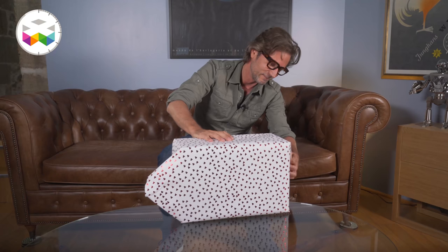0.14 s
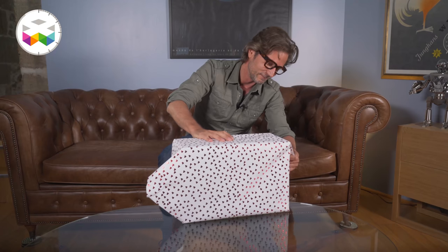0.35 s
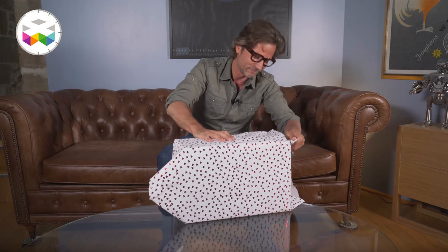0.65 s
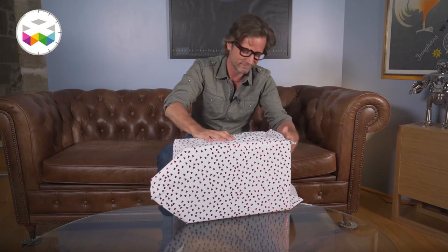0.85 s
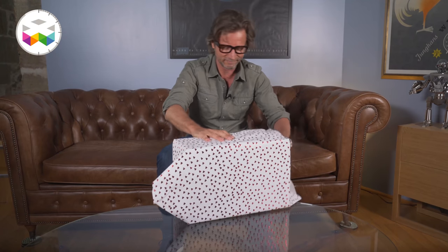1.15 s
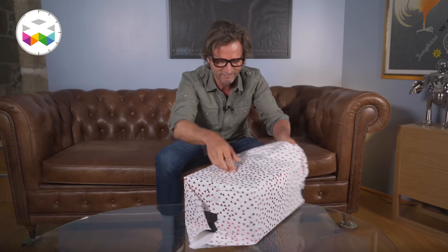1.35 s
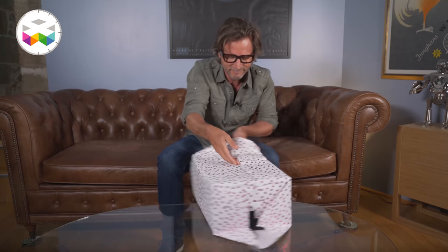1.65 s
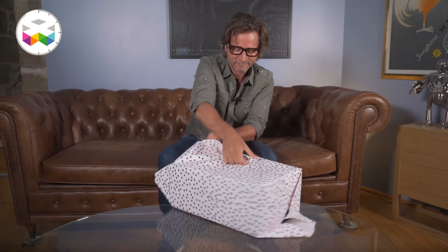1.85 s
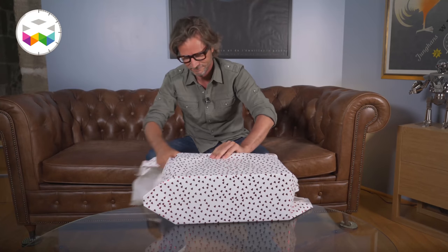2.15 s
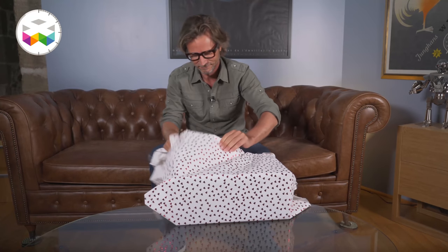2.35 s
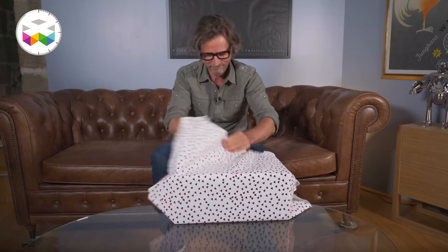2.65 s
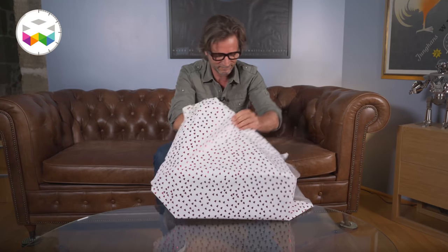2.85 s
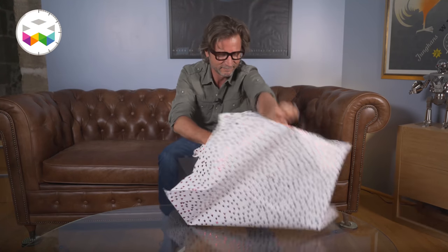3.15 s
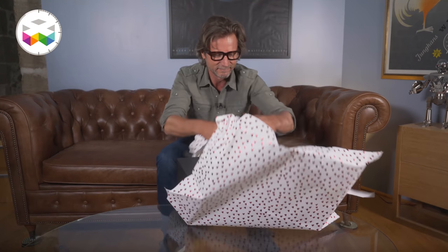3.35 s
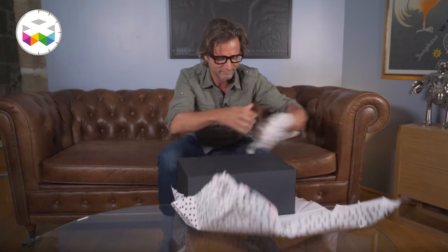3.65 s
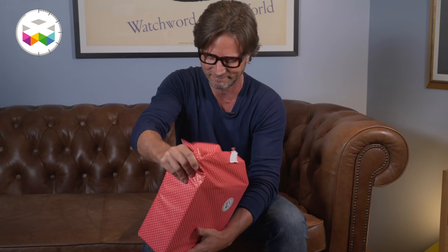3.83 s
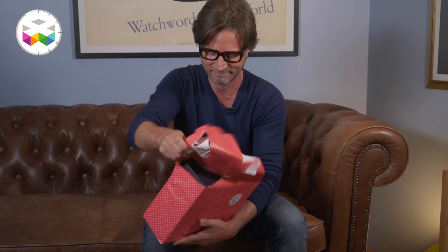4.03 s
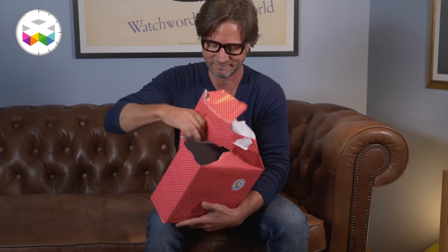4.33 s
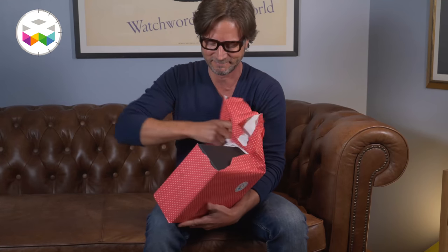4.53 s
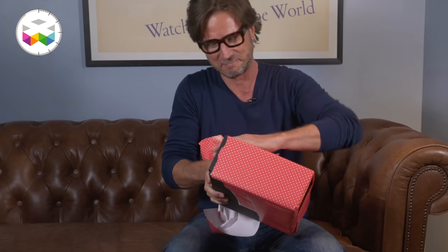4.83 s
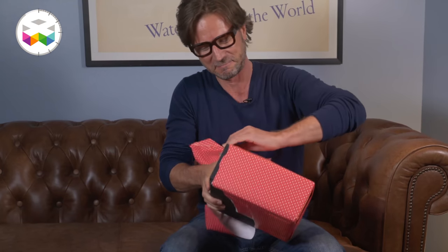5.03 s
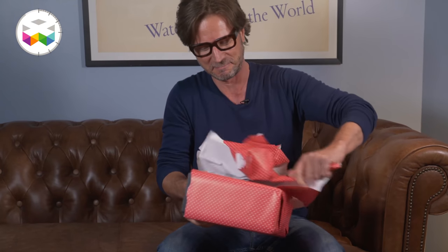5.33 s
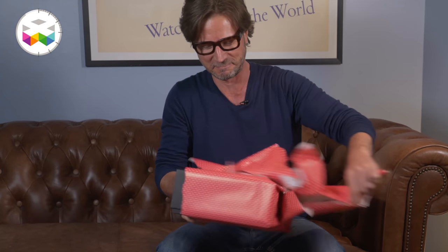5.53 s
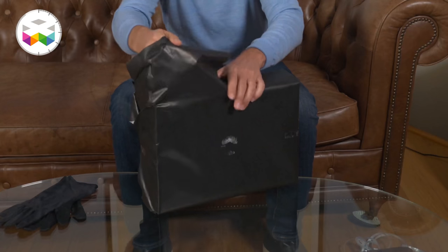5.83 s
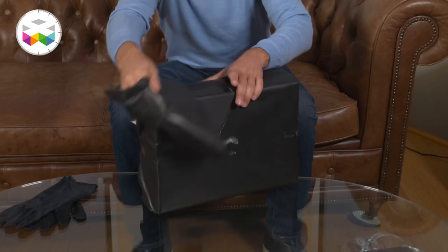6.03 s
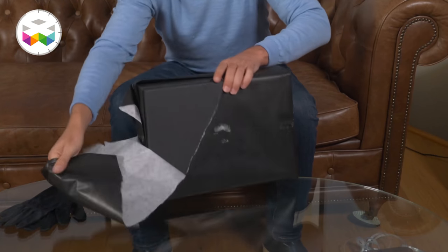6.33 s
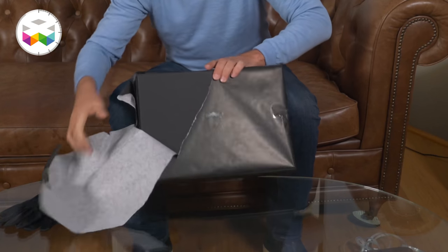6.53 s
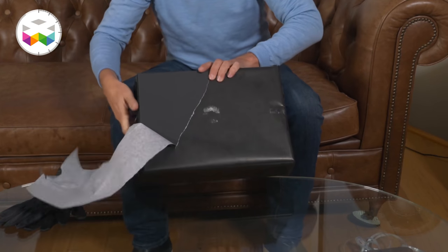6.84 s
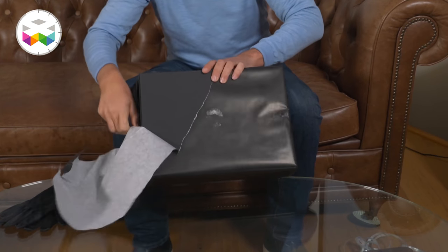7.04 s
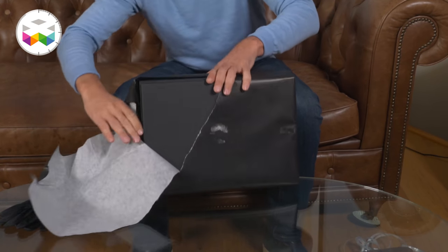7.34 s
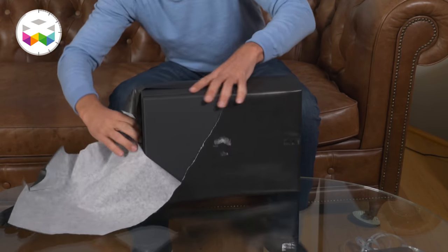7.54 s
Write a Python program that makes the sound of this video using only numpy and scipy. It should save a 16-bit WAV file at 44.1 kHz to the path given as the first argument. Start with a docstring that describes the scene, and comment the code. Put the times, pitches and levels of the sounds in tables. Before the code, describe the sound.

Hands rip and crumple wrapping paper off boxes indoors, in a rapid, irregular run of tearing, sharp crackles and a few hollow thuds.

```python
"""First comes a sharp rip and a thud: hands tear wrapping paper off cardboard boxes in a living room.
They rip and crumple thin, then glossy, then heavy paper. Creases buckle in swarms of tiny noise bursts,
big folds crack, fingers creak on the glossy side and the knocked boxes ring. Flapping sheets push air
at one nearby microphone, the loudest cracks clip, and a faint hiss lies under it all."""
import sys
import numpy as np
from scipy import signal
from scipy.fft import rfft, irfft, next_fast_len
from scipy.io import wavfile
from scipy.ndimage import uniform_filter1d

SR = 44100
rng = np.random.default_rng(int(sys.argv[2]) if len(sys.argv) > 2 else 0)


def unload_wav(signal):
    """Save mono or channel-first audio to the path in sys.argv[1] as 16-bit WAV at rate SR, clipped to [-1, 1]."""
    wavfile.write(
        sys.argv[1],
        SR,
        np.round(np.clip(np.atleast_2d(signal).T, -1, 1) * 32767).astype(np.int16),
    )


N = 338673

# Each pull of the hands: t/s at full strength, rise/s, hold/s, fall/s, level/dB, crumple (0 = tear, to 1),
# hollow f/Hz, large panels/dB and fibres/dB (both added to the level), pushed air/dB
HAND_PULLS = [(0.032, 0.12, 0.029, 0.16, -21, 0.065, 1840, -5.5, -9, -30.5),
              (0.344, 0.17, 0.0, 0.1, -24, 0.52, 1400.0, 2.5, -3, -32),
              (0.438, 0.34, 0.21, 0.26, -28, 0.83, 1200.0, -3, 0, -42),
              (0.602, 0.003, 0.046, 0.17, -17.5, 0.44, 5550, -1.5, -1.5, -33),
              (0.94, 0.29, 0, 0.24, -26.5, 0.66, 4230, -4.5, -5.5, -40.0),
              (1.148, 0.1, 0.0001, 0.061, -17, 0.84, 5500.0, -1, -1.5, -35.0),
              (1.28, 0.17, 0, 0.18, -19.5, 0.4, 3320, -2, -2.5, -32),
              (1.614, 0.34, 0, 0.023, -36.5, 0.95, 4200.0, 0.5, -12, -48),
              (1.81, 0.19, 0.0045, 0.072, -17, 0.94, 1410, -8, 1, -42),
              (1.939, 0.22, 0.061, 0.14, -24.5, 0.56, 5500.0, -1, -1.5, -41),
              (2.156, 0.028, 0.0082, 0.033, -18.5, 0.54, 1210, -2.5, -1.5, -38.0),
              (2.214, 0.13, 0.16, 0.037, -25.5, 0.63, 5000, -4, -3, -40),
              (2.445, 0.089, 0.073, 0.16, -26.5, 0.7, 690, -3, -2.5, -51),
              (2.724, 0.075, 0.02, 0.15, -17, 0.44, 5600, -2, -2, -26.5),
              (2.967, 0.32, 0.01, 0.31, -26, 0.6, 597, 0, -8, -39),
              (3.12, 0.021, 0.024, 0.15, -17, 0.5, 1530, -3, -9, -48),
              (3.304, 0.065, 0.013, 0.51, -32, 0.64, 700.0, -2, -4.5, -41),
              (3.555, 0.047, 0.058, 0.09, -16.5, 0.26, 2500, -2, -7, -25),
              (3.734, 0.03, 0.00021, 0.16, -23, 0.26, 600.0, -5.5, -9.5, -39),
              (3.931, 0.0048, 0.05, 0.05, -17.5, 0.1, 903, -4, 1, -32),
              (4.182, 0.3, 0.073, 0.12, -26, 0.51, 710, -9, -5.5, -43),
              (4.356, 0.058, 0.029, 0.021, -26.5, 0.3, 1040.0, 4.5, -1, -40),
              (4.417, 0.03, 0.092, 0.35, -18.5, 0.15, 3160, -4.5, -2.5, -35),
              (4.676, 0.22, 0.02, 0.18, -20.5, 0.37, 3880, -1.5, -6, -31),
              (4.848, 0.027, 0, 0.19, -29, 1, 596, -3, -16, -38),
              (5.047, 0.043, 0.012, 0.037, -20, 0.3, 3600.0, 0, -13, -47),
              (5.103, 0.018, 0.09, 0.21, -24.5, 0.69, 1570, -17, -5.5, -41),
              (5.262, 0.5, 0.15, 0.11, -25.5, 0.13, 4100, -3.5, -0.5, -46),
              (5.59, 0.16, 0.0054, 0.23, -21.5, 0.13, 910.0, -6.5, -3.5, -43),
              (5.834, 0.003, 0.011, 0.27, -18.5, 0.47, 810, -5.5, -4, -31),
              (5.998, 0.003, 0.021, 0.023, -21.5, 0.2, 810, 8.5, 2, -37),
              (6.039, 0.015, 0.018, 0.033, -18.5, 0.22, 810, 2, 2, -27.5),
              (6.09, 0.13, 0.046, 0.39, -22.5, 0.15, 3100, -2.5, -0.5, -43),
              (6.25, 0.14, 0.17, 0.35, -23.0, 0.21, 1100.0, -6.0, -6.5, -43),
              (6.81, 0.0052, 0.025, 0.12, -26, 0.42, 800.0, -3.5, -6.5, -37),
              (6.913, 0.026, 0.18, 0.083, -28.5, 0.41, 4170, -3.5, -3, -44),
              (7.111, 0.025, 0.13, 0.12, -25.5, 0.52, 1290, -3.5, -7, -45),
              (7.258, 0.028, 0.14, 0.037, -30.5, 0.44, 1600.0, -8, -3.5, -43),
              (7.619, 0.19, 0.088, 0.274, -23, 0.51, 4830, -0.5, -1.0, -33.5)]
CUT_S = 4.8  # earlier pulls and their echo stop short here
def paper():
    """Tearing is a dense fine rasp, crumpling a sparse swarm; both, and the cracks, shake the sheet."""
    db, crumpling, hollow_hz, panel_db, fibre_db = np.transpose(HAND_PULLS)[4:9]
    t = np.arange(N) / SR
    grid, creases = pull_power(db, rest_db=-60)
    _, panels = pull_power(db + panel_db, rest_db=-58.5)
    _, fibres = pull_power(db + fibre_db, rest_db=-51.5, fall_share=0.81)
    smooth = lambda values: np.interp(t, grid, values)
    strength = np.repeat([smooth(part.sum(axis=0)) for part in (panels, creases, fibres)], 4, axis=0)
    lead = creases ** 2 / np.sum(creases ** 2, axis=0)  # the strongest pull shapes the sheet
    bend = 0.19 * np.interp(grid, t, wander(1900))  # the hollow changes as the sheet bends
    bent_hz = np.exp(np.log(hollow_hz) @ lead + bend)
    hollow = np.array([smooth(band) for band in band_shares(bent_hz, octaves=0.18, base=0.37)])
    waver = undb(1.97 * np.array([wander(1180) for _ in range(12)])) ** 2  # each band on its own
    crumple = smooth(np.clip(crumpling @ lead, 0, 1))
    snaps = swarm(per_s=400, spread_db=3.9, cap_db=13.5, rise_ms=0.08, ms=0.74, octaves=0.45, base=0.015)
    rips = swarm(per_s=1600, spread_db=1.2, cap_db=4.4, rise_ms=0.6, ms=1.6, octaves=0.37, base=0.017)
    buckles = swarm(per_s=240, spread_db=5.1, cap_db=10.6, rise_ms=0.073, ms=3.9, octaves=0.76, base=0.011)
    rasp = 0.21 + 0.37 * rips + 0.052 * snaps  # snaps are single fibres parting
    grain = (1 - crumple) * rasp + crumple * buckles
    grain[:4] = 0.7 * grain[:4] + 0.31  # large panels move more evenly
    shaken = paper_noise() * np.sqrt(strength * hollow * waver * grain + cracks())
    return shaken.sum(axis=0)


def pull_power(db, rest_db, fall_share=1):
    """Each pull swells, holds and dies away to a settling sheet. Gives times and power per pull."""
    t = np.arange(N // 44 + 2) * 44 / SR  # about 1 ms apart
    start, rise, hold, fall = np.abs(np.transpose(HAND_PULLS)[:4, :, None])
    rising = (start - t) / rise
    falling = (t - start - hold) / (fall * fall_share)
    drop_db = 20 * np.maximum(np.maximum(rising, falling), 0)
    sounding = (start > CUT_S) | (t < CUT_S)
    power = undb(db[:, None] - drop_db) ** 2 * sounding
    return t, power + undb(rest_db) ** 2 / len(HAND_PULLS)


def swarm(per_s, spread_db, cap_db, rise_ms, ms, octaves, base):
    """Tiny ticks of paper at random times and pitches, few large and many small; average power 1."""
    when, rank, pitch = rng.random((int(per_s * N / SR), 3)).T
    size = undb(np.minimum(-spread_db * np.log(1 - rank), cap_db))
    shares = band_shares(250 * 60 ** pitch, octaves, base)
    power = bursts((when * N).astype(int), size ** 2 * shares, ms, rise_ms)
    return power / power.mean(axis=1, keepdims=True)


# Borders of twelve pitch bands, low to high: f/Hz
BAND_EDGES = (110, 220, 360, 560, 900, 1400, 2200, 3500, 5500, 7500, 10000, 13000, 17000)
# The tone of each kind of paper: f/Hz, relative level/dB
THIN_PAPER = [(59, -20), (100, 0), (135, -2.5), (435, -2.5), (898, -7), (1560, -3.5), (3360, -6),
              (5730, -7.5), (14900, -16.5), (16300, -12)]
GLOSSY_PAPER = [(59, -30), (100, -2.5), (303, -2), (408, -4.5), (710, -2), (1600, -5.5), (3440, -6.5),
                (6650, -12.5), (12300, -4), (15300, -2.5), (16300, -23)]
HEAVY_PAPER = [(59, -39), (100, -20), (156, -5), (230, -8.5), (278, -6), (599, -4), (824, -1), (2500, -2.5),
               (9970, -5.5), (14900, -10.5), (16300, -22)]
NEXT_PAPER_S = (3.92, 5.82)
def paper_noise():
    """Each paper's rustle in twelve bands: four each for panels (low), creases and fibres (high)."""
    out, edges = np.zeros((12, N)), np.array(BAND_EDGES)
    starts = [0] + [int(s * SR) for s in NEXT_PAPER_S] + [N]
    for tone, start, end in zip((THIN_PAPER, GLOSSY_PAPER, HEAVY_PAPER), starts, starts[1:]):
        spectrum, hz = noise_spectrum(tone)
        above = 1 / (1 + (edges[:, None] / hz) ** 8)
        bands = irfft(spectrum * np.sqrt(above[:-1] - above[1:]), next_fast_len(N))[:, start:end]
        group_power = np.mean(bands ** 2, axis=1).reshape(3, 4).sum(axis=1)
        out[:, start:end] = bands / np.repeat(np.sqrt(group_power), 4)[:, None]
    return out


# Big folds giving way: t/s, relative level/dB, f/Hz, extra level for the fibres/dB
FOLD_CRACKS = [(0.05, 2, 5300, -17), (0.1752, -8, 4100, -6), (0.228, -10, 5040, 6.5),
               (0.2579, 4.5, 6100, -4), (0.3087, 1, 4120, -11), (0.332, 1.5, 1490, 0), (0.345, 1, 1400, -2),
               (0.362, 1, 5660, -5), (0.407, -4, 6000, -11), (0.435, -9, 1550, 5.5), (0.4444, 1, 5900, -7),
               (0.477, -10, 2080, -13), (0.4995, 0.5, 2190, -14), (0.504, -1, 484, -10),
               (0.544, -3.5, 504, 3), (0.6037, 7, 900, -3), (0.643, 2, 2850, -2), (0.679, -4, 5700, -6),
               (0.7348, -1.5, 2330, -8), (0.9625, -1, 2130, -9), (1.083, -5.5, 1530, -2),
               (1.102, 0, 5960, -4), (1.109, -1.5, 1220, 4), (1.1477, -3, 7140, 3), (1.1544, 0.5, 3400, -6),
               (1.1928, -0.5, 710, -8), (1.227, -1.5, 1520, -21), (1.2762, 0, 2520, -13),
               (1.286, 1, 4400, 1), (1.3419, 0.5, 5140, -5), (1.3542, 3, 3350, -0.5),
               (1.4534, -5.5, 3380, -0.5), (1.6093, -8.5, 2300, -3), (1.767, 3, 8300, 2),
               (1.8004, -1, 1500, -6), (1.842, 2, 5740, 1), (2.032, -12, 1740, 7), (2.153, -6, 3120, -5),
               (2.227, -4, 3660, 3), (2.236, -1, 6500, 1), (2.3083, -7, 2170, -6),
               (2.4253, 2.5, 7400, -3.5), (2.4444, -5, 2210, 1), (2.4572, -4, 2130, 5),
               (2.5122, -1, 490, -1), (2.5334, 0.5, 900, 1), (2.627, -4.5, 2040, -9), (2.635, 1, 5500, 0.5),
               (2.644, -11, 7000, 1), (2.674, -1, 4800, 0), (2.698, -7, 2800, -4), (2.735, 2, 5500, -6),
               (2.755, -2, 4900, 1), (2.687, 3, 3120, 2), (2.721, -7, 660, 5), (2.889, -6, 2410, 1.5),
               (2.9763, 1, 5200, 1), (3.097, -0.5, 2570, -25), (3.131, 2, 1200, 2),
               (3.304, -5.5, 2270, 1.5), (3.322, -6, 2000, -2), (3.469, -9.5, 900, 3),
               (3.5102, -4, 2580, 1), (3.5585, 2, 2520, -1), (3.573, 3.5, 2520, -3), (3.585, 5.5, 4600, -7),
               (3.592, 4, 7040, -4), (3.61, 8.5, 2650, 0), (3.6509, 3.5, 5530, -5.5),
               (3.733, -8.5, 2200, -1), (3.741, -4, 1820, -6), (3.8945, -11, 9000, -3),
                (4.128, -12, 880, 11), (4.145, -7.5, 2180, -4), (4.1717, -9, 7940, -2),
               (4.2435, -12, 3000, 3), (4.3486, -5, 700, -1), (4.377, -8.5, 3520, 2), (4.395, -18, 3000, 8),
               (4.503, -6, 2480, 6), (4.705, -3, 2500, -11), (4.749, -12, 2530, -2),
               (4.8312, -15, 2540, -10), (4.8564, -4.5, 2400, -7), (4.8985, -9.5, 3500, -10),
               (5.0759, 0.5, 3600, -14), (5.1177, 1, 1700, -5), (5.6, -1, 870, 1), (5.772, -9, 3300, -14),
               (5.8336, -12.5, 814, 10), (5.87, -0.5, 684, 2), (5.8914, -3, 920, 2), (5.915, -3, 710, -6),
               (5.9488, -13, 900, 2), (5.966, -3.5, 800, 0), (5.9985, 1, 930, -8),
               (6.1536, -1.5, 1230, -17), (6.2566, -1, 1410, 4), (6.265, -7, 7250, 5),
               (6.29, 0.5, 1170, -1), (6.336, 2, 1290, -4), (6.364, -5, 1370, 3), (6.373, -4, 8000, 2),
               (6.4263, -9, 1520, 8), (6.4394, -5.5, 1250, 1), (6.512, -10, 1200, -6),
               (6.782, -13.5, 2040, -11), (6.813, -8.5, 886, -4), (6.872, -4.5, 5040, 1),
               (6.9045, -9, 4100, -11), (6.925, -6, 3500, 0), (6.94, -10, 4200, -3),
               (6.945, -1.5, 4100, -2), (6.998, -10, 1500, 2), (7.047, -3, 4130, -7),
               (7.135, -0.5, 746, -6), (7.15, -4, 1460, -5), (7.1823, -0.5, 1660, 2),
               (7.203, -3, 2180, -11), (7.106, -6, 1090, -9), (7.3008, -8, 1290, 1), (7.462, -10, 595, -1),
               (7.495, -3, 3570, -3.5), (7.3717, -0.5, 7550, 1), (7.608, -3.5, 4950, 5),
               (7.6434, -5, 1660, 3), (7.6588, -7, 2220, 7)]
def cracks():
    """A fold cracks in one short burst of power; fibres set the top four bands."""
    s, db, hz, fibre_db = np.transpose(FOLD_CRACKS)
    power = undb(db - 8.5) ** 2 * band_shares(hz, octaves=0.23, base=0.052)
    power[8:] = undb(db + fibre_db - 16) ** 2
    return bursts((s * SR).astype(int), power, ms=2.34, rise_ms=0.16)


def pings(cycles=30, relative_db=-14.5):
    """The flat patch beside each fold rings briefly at the fold's pitch."""
    out, t = np.zeros(N + 1000), np.arange(1000) / SR
    for s, db, hz, _ in FOLD_CRACKS:
        i = int(s * SR)
        decay = np.exp(-t * (hz / cycles + 150))
        out[i:i + len(t)] += undb(db + relative_db) * np.sin(2 * np.pi * hz * t) * decay
    return out[:N]


# Knocks on a box: t/s, level/dB, f/Hz
BOX_KNOCKS = [(0.04, -15, 162), (0.605, -11.5, 347), (2.418, -20, 62), (2.699, -25, 360), (3.609, -12, 87),
              (4.677, -13.5, 122)]
def thuds(ring_s=0.13):
    """A knocked hollow box rings low, fading by 60 dB in ring_s."""
    out, t = np.zeros(N), np.arange(8000) / SR
    for s, db, hz in BOX_KNOCKS:
        i = int(s * SR)
        out[i:i + len(t)] += undb(db) * np.sin(2 * np.pi * hz * t) * 1000 ** (-t / ring_s)
    return out


# One list of points per finger slide: t/s, slip rate/Hz, relative level/dB, brightness (0 = dull)
FINGER_SLIDES = [
    [(4.92, 400, -45, 0.2), (4.945, 450, -21, 0.1), (4.958, 450, -30, 0.1), (4.968, 520, -28, 0)],
    [(4.9735, 80, -32, 0.7), (4.99, 83, -29, 0), (5.01, 116, -18.5, 0.28), (5.026, 140, -19.5, 0.3),
     (5.04, 245, -21, 1), (5.05, 300, -25, 1.2), (5.062, 320, -38, 2.1)],
]
# Notes at which the tight sheet rings: f/Hz, width/Hz, relative level/dB
SHEET_NOTES = [(453, 580, -1.5), (736, 124, 6.5), (1540, 190, 5.5), (3500, 1100, -2), (10000, 6000, -9)]
def creaks():
    """Skin sticks and slips on the tight sheet, and every slip makes it ring."""
    dull, bright, t = np.zeros(N), np.zeros(N), np.arange(N) / SR
    for slide in FINGER_SLIDES:
        s, hz, db, brightness = np.transpose(slide)
        rate = np.interp(t, s, hz, left=0, right=0)
        slips = np.diff(np.ceil(np.cumsum(rate) / SR), prepend=0)  # one click per cycle
        slips *= np.sqrt(SR / np.maximum(rate, 1)) * undb(np.interp(t, s, db))
        dull += slips
        bright += slips * np.interp(t, s, brightness)
    ringing = np.zeros(N)
    for k, (hz, width, db) in enumerate(SHEET_NOTES):
        resonance = signal.iirpeak(hz, hz / width, fs=SR)
        ringing += (-1) ** k * undb(db) * signal.lfilter(*resonance, dull if hz < 1000 else bright)
    return 1.9 * fade(ringing, ms=0.05)  # soft skin spreads each slip over a moment


# The tone of a puff of air and of its deepest part: f/Hz, relative level/dB
PUFF_TONE, DEEP_TONE = [(40, -10), (60, -1), (100, -1.5), (160, -6.5)], [(16, -13), (32, 10), (55, -12)]
# Deep part against the puff for thin, glossy and heavy paper (which wafts most): level/dB
WAFT_DB = (-6.5, -17, 4.5)
def air():
    """Each pull pushes a low, wavering puff of air at the microphone."""
    s, db = np.transpose(HAND_PULLS)[[0, 9]]
    deep_db = db + np.take(WAFT_DB, np.searchsorted(NEXT_PAPER_S, s))
    out = np.zeros(N)
    for tone, level_db in ((PUFF_TONE, db), (DEEP_TONE, deep_db)):
        grid, power = pull_power(level_db, rest_db=-54.5, fall_share=1.12)
        swell = np.interp(np.arange(N) / SR, grid, np.sqrt(power.sum(axis=0)))
        out += steady_noise(tone) * swell * undb(1.3 * wander(1700))
    return out


def room(x, ring_s=0.97, echo_db=-14):
    """A softly furnished room adds a blurred echo that loses its high notes first."""
    t = np.arange(int(.5 * SR)) / SR
    bright = rng.standard_normal(len(t)) * 1000 ** (-t / (.5 * ring_s))
    dull = fade(rng.standard_normal(len(t)), ms=0.078) * 1000 ** (-t / ring_s)
    tail = (bright + 0.24 * dull) * np.clip(t / 0.0015 - .5, 0, 1)
    return undb(echo_db) * signal.fftconvolve(x, tail / np.sqrt(np.sum(tail ** 2)))[:N]


# The tone of the hiss: f/Hz, relative level/dB; then its overall level
HISS_TONE, HISS_DB = [(150, 1), (1000, -19), (5000, -12), (16000, -14)], -52
def hiss():
    """The room and the microphone hiss faintly all the time."""
    return undb(HISS_DB) * steady_noise(HISS_TONE)


def band_shares(hz, octaves, base):
    """Power in each band: a hump around hz on top of an even base."""
    centres = np.sqrt(np.multiply(BAND_EDGES[1:], BAND_EDGES[:-1]))[:, None]
    return base + np.exp(-.5 * (np.log2(centres / hz) / octaves) ** 2)


def bursts(starts, power, ms, rise_ms):
    """Power over time in each band: a quick rise, then a fade that is shorter for higher bands."""
    out = np.zeros((12, N))
    for k in range(12):
        np.add.at(out[k], starts, power[k])
        out[k] = fade(out[k], ms * (1500 / BAND_EDGES[k]) ** 0.085 / 2)
    soft = np.exp(-1000 / (rise_ms * SR))
    return signal.lfilter([1 - soft], [1, -soft], out)


def noise_spectrum(tone):
    """The spectrum of a noise with the given tone, and its frequencies."""
    size = next_fast_len(N)
    hz = np.maximum(np.fft.rfftfreq(size, 1 / SR), 1)
    tone_hz, tone_db = np.transpose(tone)
    db = np.interp(np.log(hz), np.log(tone_hz), tone_db, left=-90, right=-90)
    return rfft(rng.standard_normal(size)) * undb(db), hz


def steady_noise(tone):
    """Noise with the given tone and average power 1."""
    spectrum, _ = noise_spectrum(tone)
    return unit(irfft(spectrum, next_fast_len(N))[:N])


def wander(span):
    """A slow random drift that changes over span samples."""
    return unit(uniform_filter1d(uniform_filter1d(rng.standard_normal(N), span), span))


def fade(x, ms):
    """Give every click a tail that dies away."""
    return signal.lfilter([1], [1, -np.exp(-1000 / (ms * SR))], x)


def unit(x):
    """Scale to average power 1."""
    return x / np.sqrt(np.mean(x ** 2))


def undb(db):
    """Turn decibels into a multiplier."""
    return 10 ** (np.asarray(db) / 20)


def scene():
    """Paper, boxes and fingers with their echo, hiss and air; one microphone feeds both channels."""
    close = paper() + pings() + thuds() + creaks()
    before_cut = np.arange(N) < CUT_S * SR
    echo = np.where(before_cut, room(close), room(close * ~before_cut))
    return np.tile(close + echo + hiss() + air(), (2, 1))


def record(dry):
    """The loudest cracks clip, and the very highest treble is removed."""
    clipped = np.clip(dry, -.98, .98)
    low_pass = signal.ellip(12, .2, 70, 16000, fs=SR, output="sos")
    return np.clip(signal.sosfilt(low_pass, clipped), -1, 1)


dry = scene()
out = record(dry)
unload_wav(out)
```